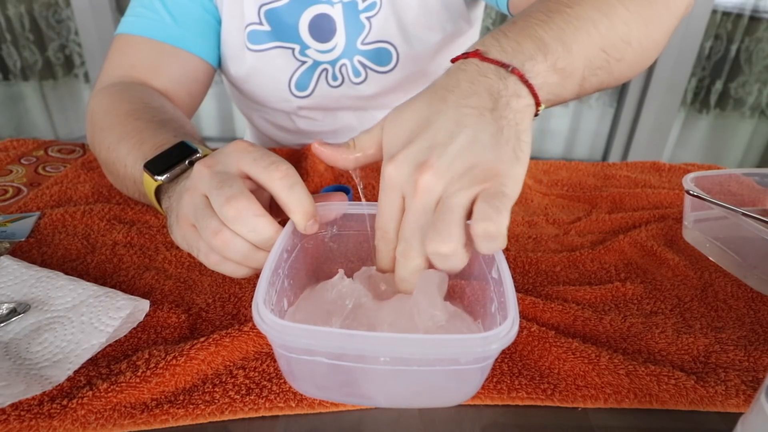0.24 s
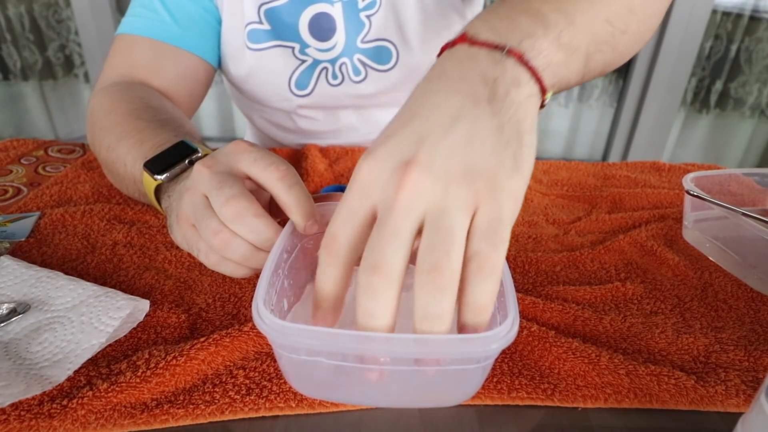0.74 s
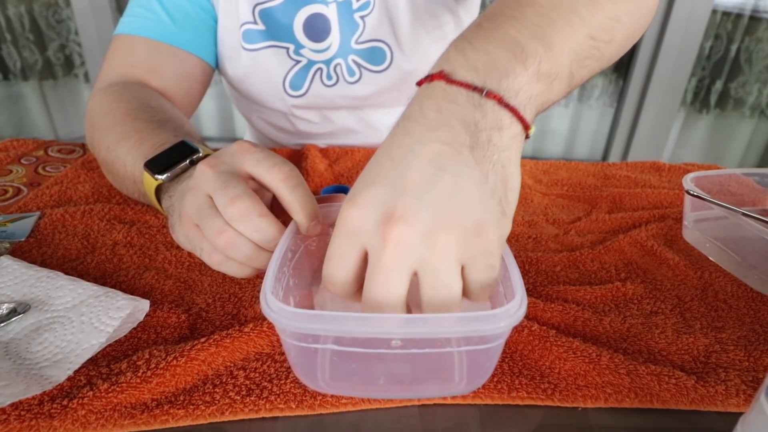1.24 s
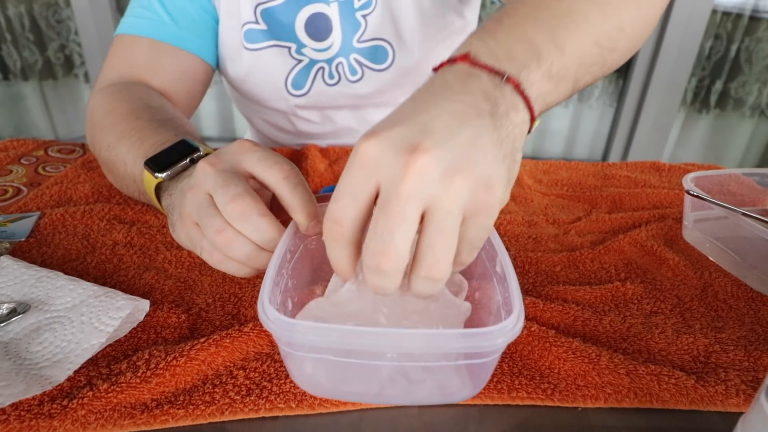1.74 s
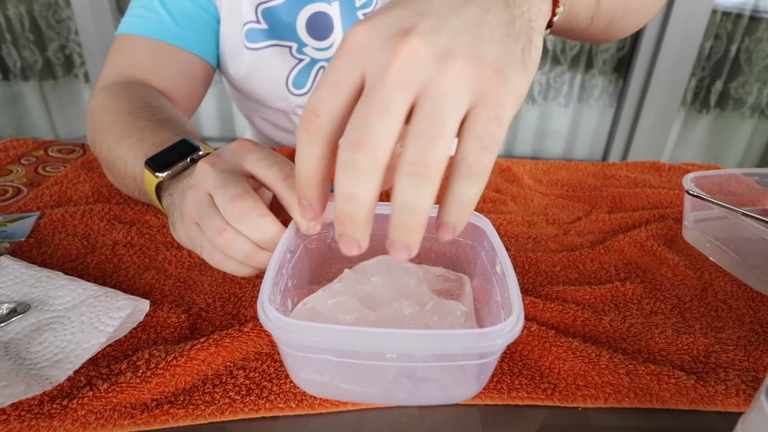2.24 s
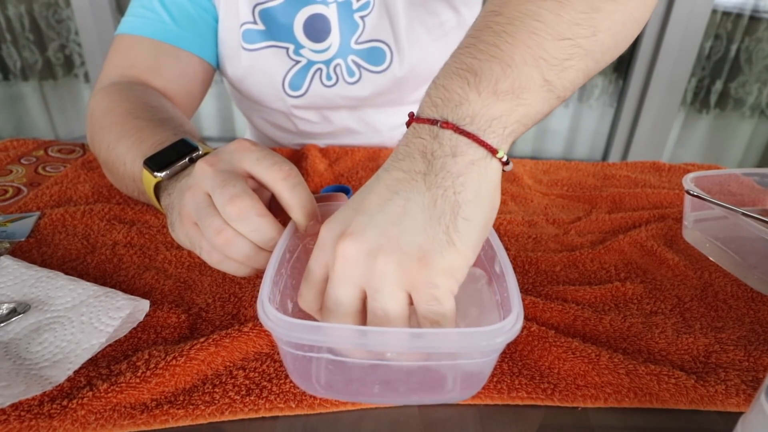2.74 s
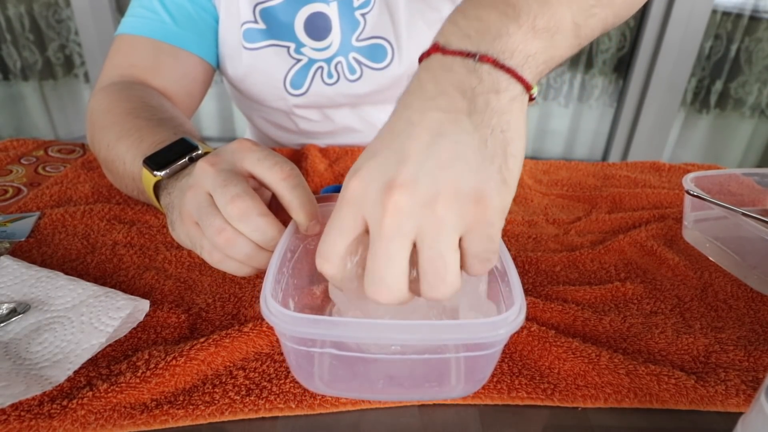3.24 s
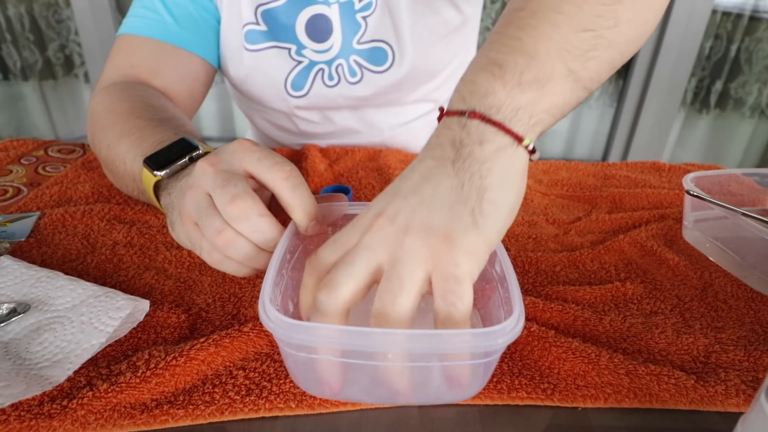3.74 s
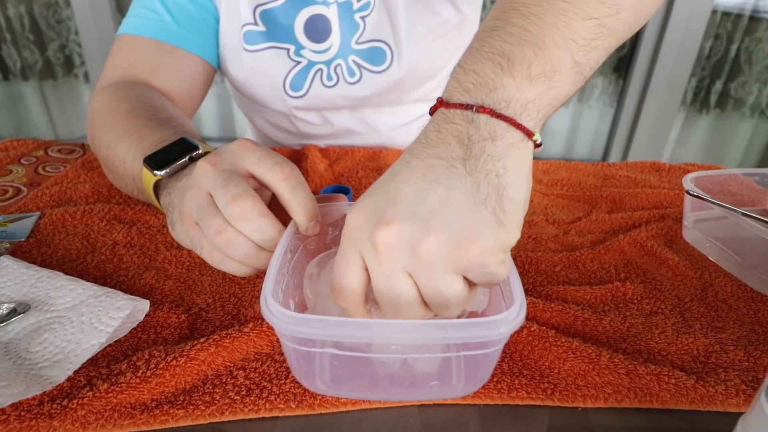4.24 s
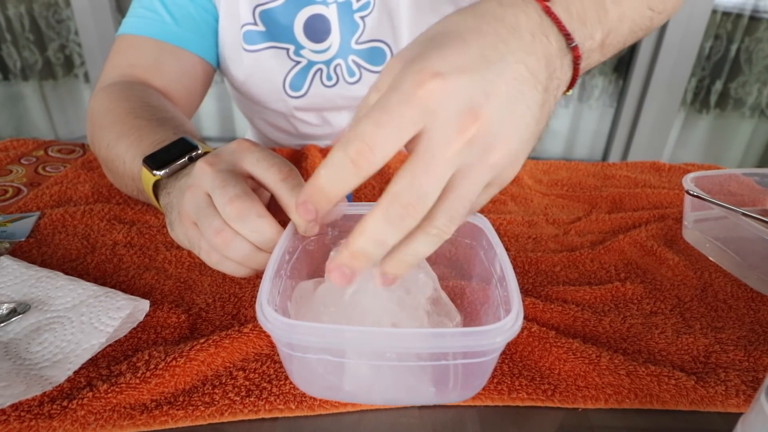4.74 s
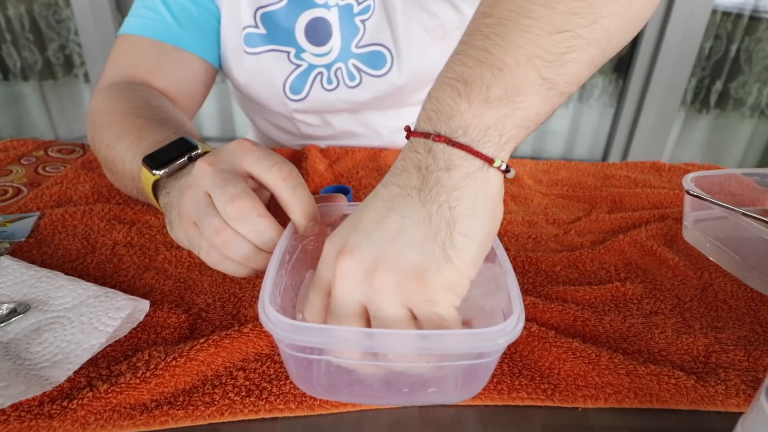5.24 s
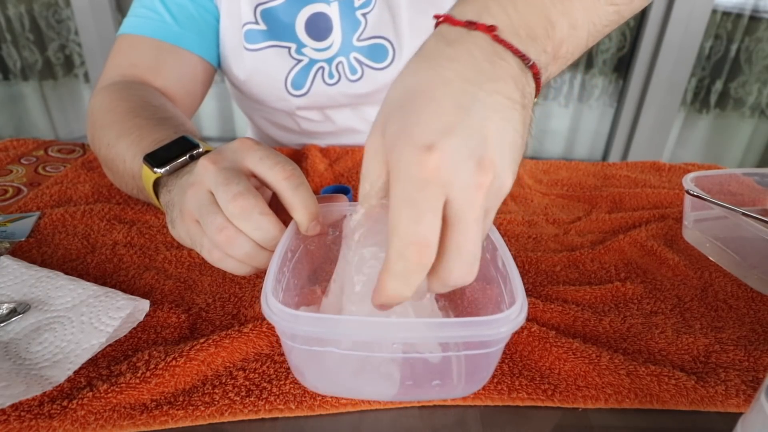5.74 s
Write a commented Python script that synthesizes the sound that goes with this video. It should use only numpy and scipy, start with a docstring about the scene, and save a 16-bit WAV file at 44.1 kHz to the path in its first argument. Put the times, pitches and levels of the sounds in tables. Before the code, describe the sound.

A hand squeezes wet slime in a small plastic tub, giving irregular sticky squelches, hollow pops and sharp bright snaps in a quiet room.

```python
"""A hand squeezes and stirs wet slime in a small plastic tub on a towel-covered table, close by, in a hard-walled room.
Filtered noise gives still-room hiss, faint hum and rumble throughout; squeezes set off crowds of tiny resonant noise puffs.
Soon trapped air pockets pop as gliding damped sines with noise, films snap as spiked noise, and the tub thumps table modes.
Midway, fingers slide with a band of hiss and air burps in pulse trains; later one pocket rings long and fingers peel free.
Broad resonances colour the pops, snaps, burps, slides and small bursts as tub air; decaying noise echoes answer as the room."""
import sys
import numpy as np
from scipy import signal
from scipy.fft import rfft, irfft
from scipy.io import wavfile

SR = 44100
rng = np.random.default_rng(int(sys.argv[2]) if len(sys.argv) > 2 else 0)


def bounce(signal):
    """Save signal as a 16-bit WAV file at the path given by the first command-line argument."""
    frames = np.transpose(np.atleast_2d(signal))
    limited = np.clip(frames, -1, 1)
    pcm = np.round(limited * 32767).astype(np.int16)
    wavfile.write(sys.argv[1], SR, pcm)


N = 264042

MIDDLE_HZ = 1020   # pitch of a middling air pocket


def from_db(db):
    """Logarithmic level: decibels become an amplitude ratio."""
    return 10 ** (np.asarray(db) / 20)


def rms_one(x):
    """Normalisation: scale a signal to unit rms."""
    return x / np.sqrt(np.mean(x ** 2) + 1e-20)


def at_hz(points, hz):
    """Interpolation: read a curve of (hz, value) points on a log-frequency axis."""
    curve = np.array(points)
    return np.interp(np.log(hz + 1), np.log(curve[:, 0]), curve[:, 1])


def resonance(x, hz, width):
    """Damped resonance: a two-pole band-pass with gain close to 1 at its peak."""
    r = np.exp(-np.pi * width / SR)
    poles = [1, -2 * r * np.cos(2 * np.pi * hz / SR), r * r]
    return signal.lfilter([(1 - r * r) / 2, 0, (r * r - 1) / 2], poles, x)


def add(out, s, grain):
    """Superposition: mix a grain in at time s."""
    i = round(s * SR)
    out[i:i + len(grain)] += grain[:N - i]


def background():
    """Stationary noise: shaped hiss, and narrow bands whose random beating makes hum and rumble waver."""
    # still-room spectrum, relative density: hz, level_db
    floor = [(45, -7.5), (100, -5.5), (350, -9), (700, -28), (1530, -21), (8360, -35.5), (16500, -40.5)]
    # swells of low rumble: centre_s, top_db
    swells = [(2.87, -68), (4.1, -71), (5.38, -64)]
    floor_db, rumble_db = -72.5, -80
    hum_hz, hum_db = 135.96, -78
    swell_width_s = 0.22

    hz = np.arange(N // 2 + 1) * SR / N
    spectrum = rfft(rng.standard_normal(N)) * from_db(at_hz(floor, hz))
    hiss = rms_one(irfft(spectrum, N))
    hum = rms_one(resonance(resonance(rng.standard_normal(N), hum_hz, 8.5), hum_hz, 8.5))
    rumble = rms_one(resonance(resonance(rng.standard_normal(N), 27.0, 9.0), 27.0, 9.0))
    t = np.arange(N) / SR
    rumble_gain = from_db(rumble_db)
    for s, top_db in swells:
        rumble_gain = rumble_gain + from_db(top_db) * np.exp(-.5 * ((t - s) / swell_width_s) ** 2)
    return from_db(floor_db) * hiss + from_db(hum_db) * hum + rumble_gain * rumble


def squeezing():
    """Power summation of squeeze envelopes: each rises, holds, lets go, then the slime slumps back."""
    # squeezes that set off crowds of bursts: start_s, hold_s, small_pops_db, small_snaps_db
    squeezes = [(0.164, .09, -69, -73.5), (0.272, 0.045, -60.5, -72), (0.354, 0.056, -62, -72.5),
                (0.788, .035, -51.5, -56), (1.779, .03, -47.5, -60), (1.854, .3, -65, -74),
                (2.152, 0.05, -43, -43.5), (2.428, 0.27, -60.5, -68.5), (3.252, 0.14, -69.5, -58),
                (3.72, 0.45, -58.5, -71.5), (4.1214, 0.022, -27.5, -34), (4.135, 0.043, -34.5, -42.5),
                (4.483, 0.2, -71.5, -66), (5.002, .25, -61, -69), (5.285, 0.037, -45, -68),
                (5.36, 0.16, -70, -67.5), (5.607, 0.085, -76, -71.5), (5.691, 0.078, -68.5, -57.5),
                (5.835, 0.1, -66.5, -66)]
    # levels at rest: small_pops_db, small_snaps_db
    at_rest_db = (-81, -76)
    attack_s, let_go_db_per_s = 0.0056, 907.5
    settle_db, settle_db_per_s = -22, 75   # the slower slump, relative to the squeeze

    t = np.arange(N) / SR
    power = from_db(at_rest_db)[:, None] ** 2
    for s, hold_s, *tops_db in squeezes:
        after = np.maximum(t - s - hold_s, 0)
        fall = from_db(-let_go_db_per_s * after) + from_db(settle_db - settle_db_per_s * after)
        shape = np.clip((t - s) / attack_s, 0, 1) * fall
        power = power + (from_db(tops_db)[:, None] * shape) ** 2
    return 10 * np.log10(power)


def small_bursts(level_db, per_s, low_hz, high_hz, cycles, spread_db, tilt_db, smear_s, ooze, count=14):
    """Random point process: wet puffs of uneven size over a soft ooze excite resonances spread in pitch."""
    crowd_db = -50   # at this level the bursts come twice as often as per_s
    crowding = 1 + from_db(level_db - crowd_db)   # harder squeezes burst more pockets at once
    sizes = from_db(spread_db * np.minimum(rng.exponential(1, N), 3))
    happens = rng.random(N) < per_s * crowding / SR
    starts = sizes * happens / np.sqrt(crowding) + 1e-18
    dealt = rng.integers(0, count, N)   # which resonance each burst excites
    noise = rng.standard_normal((2, N))
    fade = np.exp(-1 / (smear_s * SR))
    rings = np.zeros(N)
    for k, hz in enumerate(np.geomspace(low_hz, high_hz, count)):
        envelope = signal.lfilter([1], [1, -fade], starts * (dealt == k))
        puffs = noise[k % 2] * (ooze + envelope)
        ring = resonance(resonance(puffs, hz, hz / cycles), hz, hz / cycles)
        rings += from_db(tilt_db * np.log2(hz / low_hz)) * ring   # tilt_db is per octave
    return from_db(level_db) * rms_one(rings)


def tub(x, direct=0.58):
    """Cavity resonance: the air inside the tub favours a few broad pitches."""
    # modes of the air: hz, width_hz, level_db
    tub_air = [(610, 220, -13), (1075, 290, -1), (1670, 840, -7), (3555, 240, -11.5)]
    return direct * x + sum(from_db(db) * resonance(x, hz, width) for hz, width, db in tub_air)


def room(x, build_s=0.0009):
    """Reverberation: dense echoes begin at the first wall and die faster in the treble."""
    # reverberation time: hz, t60_s
    room_t60 = [(1400, 0.64), (3700, 0.61), (9700, 0.29), (16000, 0.28)]
    first_wall_s, wall_dull_hz = 0.0077, 6640

    t = np.arange(SR) / SR
    edges = 100 * 2.0 ** np.arange(8.5)   # octave bands
    echoes = np.zeros(SR)
    for low, high in zip(edges, np.minimum(edges[1:], .45 * SR)):
        octave = signal.butter(2, [low, high], "band", fs=SR, output="sos")
        band = signal.sosfilt(octave, rng.standard_normal(SR))
        echoes += band * from_db(-60 * t / at_hz(room_t60, np.sqrt(low * high)))
    echoes *= 1 - np.exp(-np.maximum(t - first_wall_s, 0) / build_s)
    echoes = signal.lfilter(*signal.butter(1, wall_dull_hz, fs=SR), echoes)   # soft furnishings swallow treble
    return signal.fftconvolve(x, echoes / np.sqrt(np.sum(echoes ** 2)))[:N]


def pop(hz, t60, chance, noise, rise_s=0.00054, wet=0.8, glide=6.0):
    """Damped air resonance: a pocket rings as it opens, its pitch rising, with noise from spitting slime."""
    t = np.arange(len(noise)) / SR
    shape = (1 - np.exp(-(t / rise_s) ** 2)) * from_db(-60 * t / t60)
    # chance sets the starting phase in cycles; pitch rises by 2 * glide of itself per second
    tone = np.sin(2 * np.pi * (hz * t * (1 + glide * t) + chance))
    spit = rms_one(resonance(resonance(noise, 0.72 * hz, 0.9 * hz), 1.04 * hz, 1.7 * hz))
    spit = rms_one(signal.lfilter(*signal.butter(2, min(2.39 * hz, 15000), fs=SR), spit))
    wetness = wet * min(1, MIDDLE_HZ / hz) ** 0.34   # small pockets ring cleaner
    grain = shape * (tone + wetness * spit)
    return grain / np.abs(grain).max()


def bursting_pockets():
    """Damping by size: deeper and louder air pockets ring longer."""
    # air pockets bursting, before the tub: start_s, pitch_hz (at onset), peak_db
    pockets = [(0.2969, 1000, -42), (0.358, 960, -42), (0.5074, 1014, -32), (0.5144, 1800, -31),
               (0.532, 448, -36), (0.789, 533, -34.5), (0.7975, 1030, -32), (0.8063, 1756, -24.5),
               (0.8064, 577, -21), (0.8166, 417, -24), (1.0081, 1000, -38.5), (1.0097, 1780, -36),
               (1.045, 1773, -39.5), (1.3741, 830, -44.5), (1.7882, 1670, -31), (1.7967, 1230, -35),
               (1.808, 2310, -31.5), (2.011, 1800, -37), (2.175, 1400, -27.5), (2.1874, 1810, -22),
               (2.4494, 1800, -28), (2.466, 546, -28), (2.6411, 1590, -33), (2.744, 2260, -40),
               (3.088, 1050, -41), (3.38, 950, -23.5), (3.584, 1920, -41), (3.61, 1620, -43.5),
               (3.7134, 1148, -23.5), (3.714, 510, -22.5), (3.946, 1690, -41.5), (3.7684, 970, -27),
               (3.817, 1130, -37.5), (3.867, 874, -33), (3.8914, 1600, -33), (3.9194, 1640, -28.5),
               (3.9774, 1520, -35.5), (4.0253, 610, -36.5), (4.044, 588, -28.5), (4.088, 674, -34.5),
               (4.1087, 600, -36), (4.1235, 1050, -22), (4.126, 605, -16.5), (4.135, 986, -21),
               (4.695, 1670, -42), (4.6984, 3740, -29), (5.006, 1556, -31.5), (5.021, 1644, -25),
               (5.146, 317, -44), (5.19, 2030, -36.5), (5.2656, 425, -42), (5.2874, 720, -24.5),
               (5.299, 1076, -27), (5.728, 1280, -35), (5.86, 1630, -32)]
    middle_t60_s, middle_db = 0.018, -34
    longer_per_octave_down, longer_per_10_db = 1.4, 1.17   # factors on t60

    out = np.zeros(N)
    noise = rng.standard_normal((len(pockets), 4000))
    for (s, hz, peak_db), row in zip(pockets, noise):
        t60 = middle_t60_s * longer_per_octave_down ** np.log2(MIDDLE_HZ / hz)
        t60 *= longer_per_10_db ** ((peak_db - middle_db) / 10)
        add(out, s, from_db(peak_db) * pop(hz, t60, row[0], row))
    return out


def snap(hz, noise, t60=0.012, broad=0.2, sharpness=3.6, spike=9.0):
    """Impulse excitation: a film parts with a spike, then rips on briefly, coloured by its size."""
    rip = noise * from_db(-60 * np.arange(len(noise)) / SR / t60)
    add(rip, 0, np.array([spike]))
    coloured = rms_one(resonance(rip, hz, hz / sharpness))
    grain = coloured + broad * rms_one(np.diff(rip, prepend=0))
    return grain / np.abs(grain).max()


def tearing_films():
    """Sudden release of tension: sticky films tear with bright snaps."""
    # films tearing, before the tub: start_s, strongest_hz, peak_db
    films = [(0.344, 2950, -45), (0.533, 1890, -32.5), (0.5079, 7740, -6.5), (0.5075, 4200, -16.5),
             (0.777, 7400, -41), (0.789, 6300, -36), (0.7969, 3360, -24), (0.816, 3600, -31.5),
             (0.911, 2430, -40.5), (1.2269, 3940, -33.5), (1.5473, 7400, -41), (1.7894, 7290, -18),
             (1.7991, 2950, -23.5), (1.8073, 3190, -38.5), (1.81, 8440, -25.5), (1.8574, 9880, -36),
             (1.907, 6090, -39), (2.157, 4750, -41.5), (2.163, 11330, -28.5), (2.167, 4520, -11),
             (2.1739, 11100, -5.5), (2.1778, 4280, -10.5), (2.1867, 8800, -4), (2.4491, 3120, -25),
             (2.464, 3430, -25), (3.2909, 4440, -29.5), (3.347, 3410, -29), (3.381, 6500, -36.5),
             (3.5833, 12700, -28), (3.713, 3590, -24), (3.767, 3786, -28), (3.7888, 6560, -30.5),
             (3.844, 3750, -39), (4.0657, 6600, -29.5), (4.091, 2820, -28.5), (4.1235, 4120, -8.5),
             (4.314, 10260, -36.5), (4.5917, 6240, -34), (5.0216, 3730, -20), (5.2018, 3150, -30),
             (5.289, 5770, -22), (5.2995, 8600, -15.5), (5.3998, 3130, -33), (5.728, 3240, -19),
             (5.7275, 6070, -23.5), (5.846, 8360, -34), (5.859, 4500, -30.5), (5.87, 12500, -29)]
    out = np.zeros(N)
    noise = rng.standard_normal((len(films), 600))
    for (s, hz, peak_db), row in zip(films, noise):
        add(out, s, from_db(peak_db) * snap(hz, row))
    return out


def thumps(contact_s=0.0011):
    """Modal excitation: soft pushes of the tub ring the table top."""
    # tub on table: start_s, push_db (before the table modes)
    contacts = [(0.537, -45), (0.809, -37), (2.453, -42), (3.349, -51), (3.718, -41.5), (5.207, -54)]
    # modes of the table top: hz, level_db, t60_s
    modes = [(108, 0, 0.14), (205, 1, 0.06), (390, 5, 0.04)]

    pushes = np.full(N, 1e-18)
    for s, push_db in contacts:
        push = np.hanning(round(contact_s * SR)) / (contact_s * SR / 2)
        add(pushes, s, from_db(push_db) * push)
    out = np.zeros(N)
    for hz, level_db, t60 in modes:
        r, w = from_db(-60 / (t60 * SR)), 2 * np.pi * hz / SR
        ring = signal.lfilter([.5, 0, -.5], [1, -2 * r * np.cos(w), r * r], pushes)
        out += from_db(level_db) * ring
    return signal.lfilter(*signal.butter(2, 75, "high", fs=SR), out)   # a small table radiates no deep bass


def slides():
    """Friction noise: each slide of the fingers swells and fades as a broad, smooth hiss."""
    # slides through the slime, before the tub: start_s, end_s, top_db
    strokes = [(2.46, 2.658, -67.5), (3.72, 3.855, -63), (4.463, 4.72, -71), (4.99, 5.179, -66)]
    centre_hz, width_hz = 5000, 7700

    t = np.arange(N) / SR
    swell = np.zeros(N)
    for s, end, top_db in strokes:
        swell += from_db(top_db) * np.sin(np.pi * np.clip((t - s) / (end - s), 0, 1))
    return swell * rms_one(resonance(rng.standard_normal(N), centre_hz, width_hz))


def burps():
    """Pulsed release: air forced through a slit in the slime escapes in very short pulses, their pitch drifting."""
    # runs of pulses, before the tub and the unevenness below; pitch and level head for the last values:
    # first_s, last_s, spacing_s, first_hz, last_hz, first_peak_db, last_peak_db
    runs = [(3.0484, 3.063, 0.002, 1866, 968, -26.5, -42), (3.3455, 3.35, 0.0032, 1185, 500, -19, -28.5),
            (4.06, 4.067, .0022, 1190, 1730, -19.5, -23.5), (4.1225, 4.141, 0.0035, 2230, 1890, -12, -12),
            (4.147, 4.169, 0.0035, 1945, 1510, -26, -13.5)]
    cycles = 3.4   # nominal cycles for a 60 dB decay
    uneven = .12   # share of chance in pitch and spacing

    out = np.zeros(N)
    for first, last, step, first_hz, last_hz, first_db, last_db in runs:
        noise = rng.standard_normal((16, 600))
        for s, row in zip(np.arange(first, max(last, first + step), step), noise):
            along = (s - first) / max(last - first, step)
            later = along > 0   # the first pulse keeps its exact time and level
            hz = (first_hz + along * (last_hz - first_hz)) * (1 + uneven * np.tanh(row[0]))
            peak_db = first_db + along * (last_db - first_db) + 0.66 * row[1] * later
            pulse = pop(hz, cycles / hz, 0, row, rise_s=0.00048, wet=0.085)
            add(out, s + uneven * step * row[2] * later, from_db(peak_db) * pulse)
    return out


def singing_pocket():
    """Light damping: one pocket opens slowly and sings on."""
    # the pocket, before the tub: start_s, pitch_hz (at onset), peak_db, t60_s
    s, hz, peak_db, t60 = (4.174, 900, -21, .1)
    out = np.zeros(N)
    ring = pop(hz, t60, 0, rng.standard_normal(4000), rise_s=.008, glide=5.5, wet=.4)
    add(out, s, from_db(peak_db) * ring)
    return out


def peeling_fingers():
    """Stick-slip: fingers peel free in even little slips, each a snap."""
    # runs of slips, before the tub: first_s, last_s, spacing_s, strongest_hz, peak_db
    peels = [(4.18, 4.199, 0.005, 10000, -25), (4.205, 4.239, .0066, 9940, -30)]
    out = np.zeros(N)
    for first, last, step, hz, peak_db in peels:
        for s in np.arange(first, last, step):
            add(out, s, from_db(peak_db) * snap(hz, rng.standard_normal(600)))
    return out


def scene():
    """Superposition: slime in the tub, tub on the table, all in the room."""
    room_db = -17.5   # echoes relative to the near sound
    still = background()
    pops_db, snaps_db = squeezing()
    small_pops = small_bursts(pops_db, 250, 629, 3244, cycles=3.0, spread_db=5.5,
                              tilt_db=-2.0, smear_s=0.0034, ooze=0.8)
    small_snaps = small_bursts(snaps_db, 240, 3840, 15000, cycles=3.0, spread_db=6.0,
                               tilt_db=-7.0, smear_s=0.0028, ooze=0.073)
    loud = bursting_pockets() + tearing_films() + burps() + singing_pocket() + peeling_fingers()
    near = tub(small_pops + small_snaps + loud + slides()) + thumps()
    return (near + from_db(room_db) * room(near) + still)[None]


def record(dry):
    """Port resonance and band-limiting: the microphone port lifts the high treble; the top is cut steeply."""
    cutoff_hz = 17140
    bright = dry + from_db(-8.0) * resonance(dry, 13000, 5000)
    return signal.sosfilt(signal.cheby2(16, 60, cutoff_hz, fs=SR, output="sos"), bright)


dry = scene()
out = record(dry)
bounce(out)
```